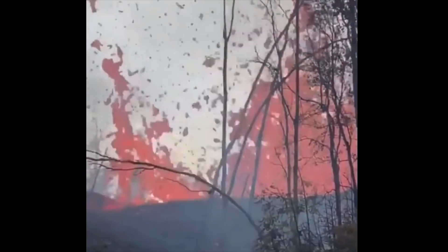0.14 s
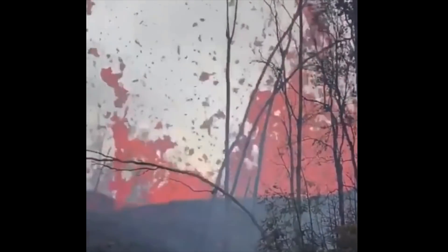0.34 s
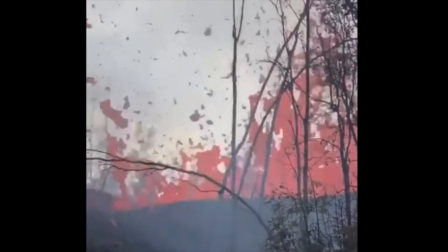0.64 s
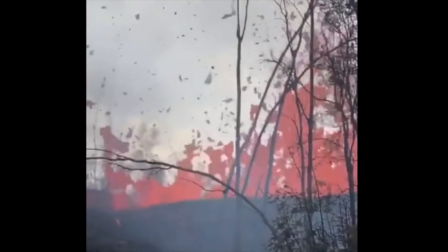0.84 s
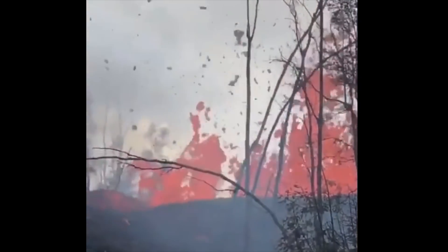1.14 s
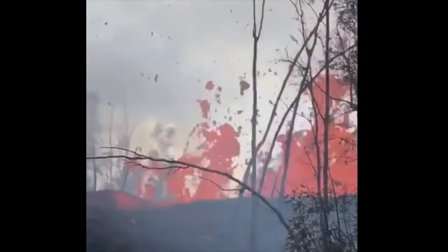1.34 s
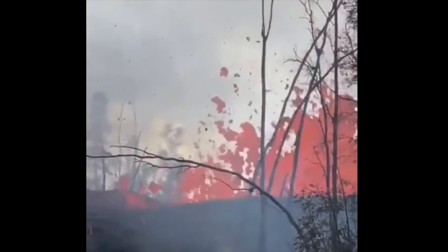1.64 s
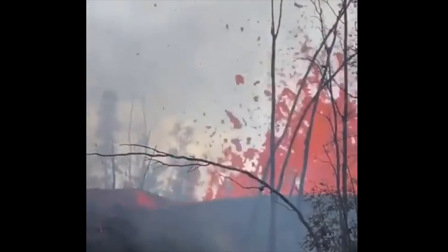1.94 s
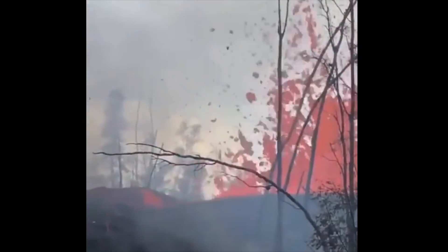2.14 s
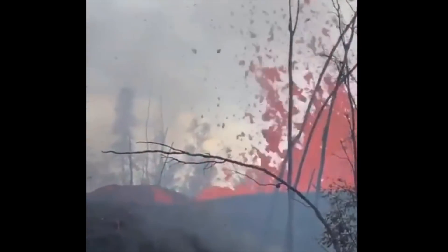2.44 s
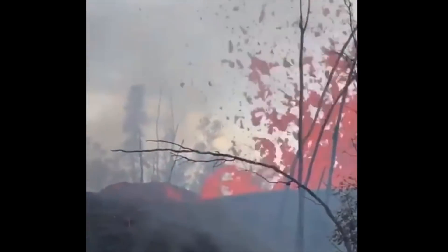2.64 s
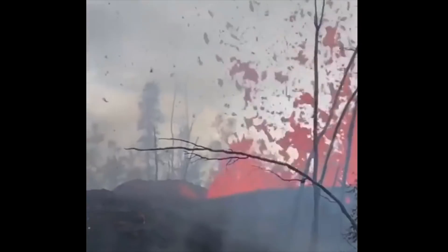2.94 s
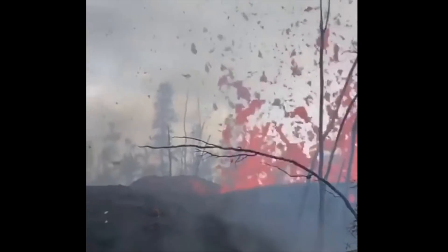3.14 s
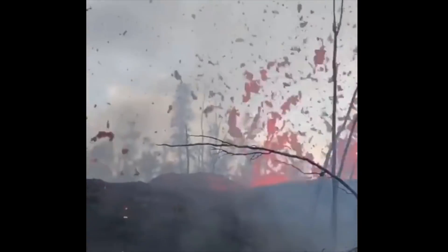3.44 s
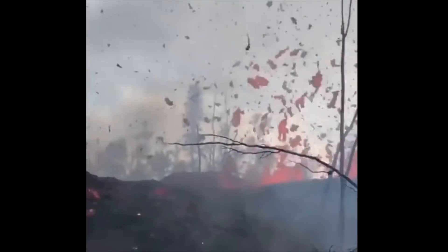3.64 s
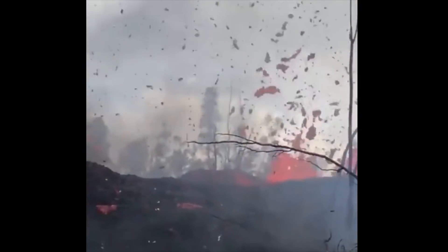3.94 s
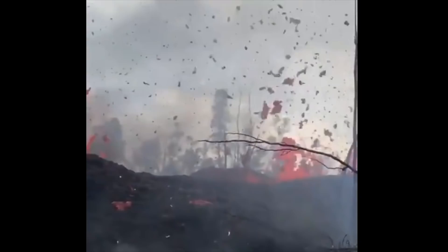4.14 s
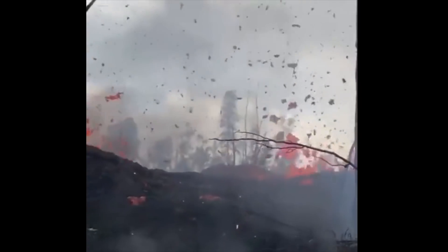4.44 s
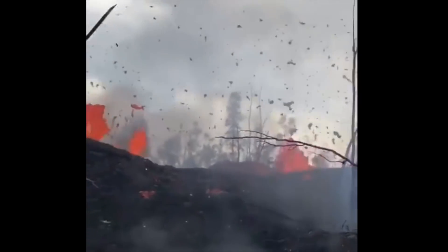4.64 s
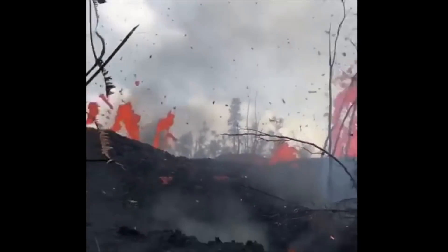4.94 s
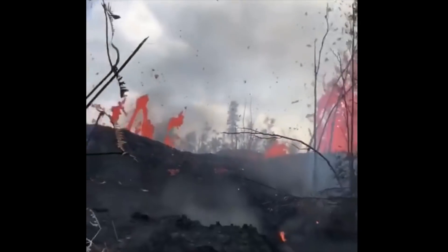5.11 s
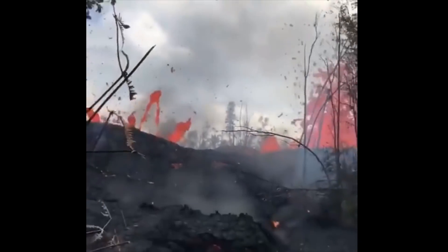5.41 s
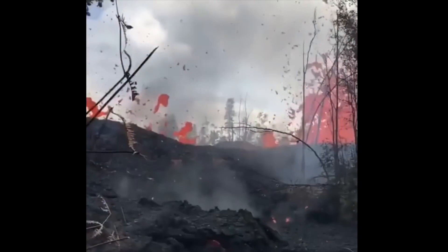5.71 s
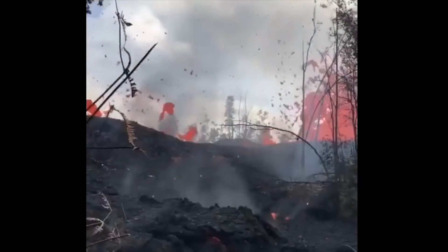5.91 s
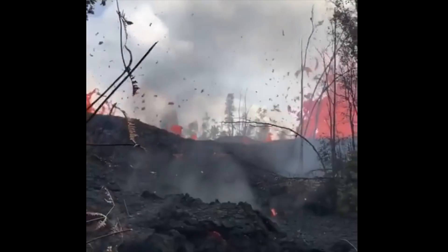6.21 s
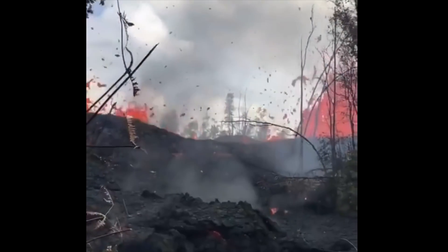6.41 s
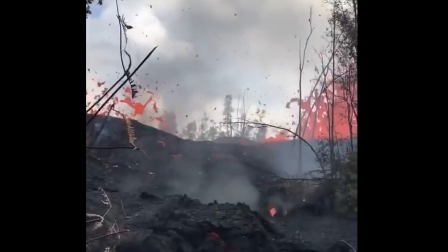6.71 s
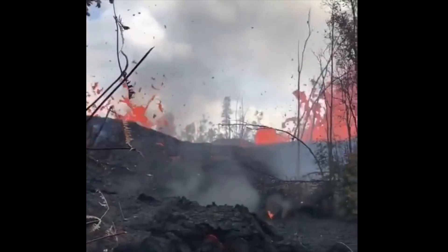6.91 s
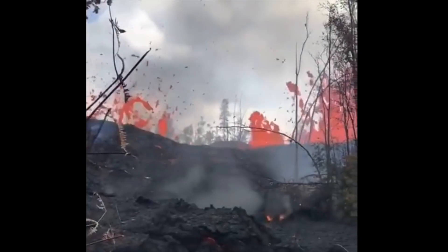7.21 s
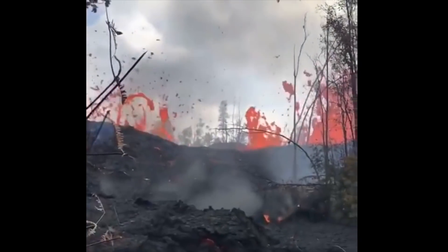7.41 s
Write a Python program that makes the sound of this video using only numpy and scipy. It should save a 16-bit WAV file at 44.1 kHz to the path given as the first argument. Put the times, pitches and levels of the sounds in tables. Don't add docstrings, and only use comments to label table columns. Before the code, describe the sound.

Molten rock and gas blast from a fissure outdoors in a heavy, unsteady roar with crackling, shredding turbulence. Low thumps and wet-sounding spatter puffs ride over it, denser after the first second, with tiny dry ticks close by. The strongest heave comes early, a sag follows past the middle, and fresh surges close it. Handset microphone, faint bottom-end air, rough narrow treble.

```python
import sys
import numpy as np
from scipy import signal
from scipy.fft import rfft, irfft, next_fast_len
from scipy.io import wavfile
from scipy.ndimage import uniform_filter1d

SR = 44100
rng = np.random.default_rng(int(sys.argv[2]) if len(sys.argv) > 2 else 0)


def unload_audio(sound):
    columns = np.transpose(np.atleast_2d(sound))
    steps = np.round(np.clip(columns, -1, 1) * 32767)
    wavfile.write(sys.argv[1], SR, steps.astype(np.int16))


def gain_from_db(level_db):
    decades = np.asarray(level_db, float) / 20
    return 10 ** decades


N = 333396
ENVELOPE_HZ = 200


def rms_one(x):
    return x / np.sqrt(np.mean(x ** 2) + 1e-20)


def coloured(x, spectrum):
    hz, db = np.transpose(spectrum)
    size = next_fast_len(N)
    bins = np.arange(1, size // 2 + 2) * SR / size
    gain = gain_from_db(np.interp(np.log(bins), np.log(hz), db))
    return irfft(rfft(x, size) * gain, size)[:N]


def drift(rate):
    hop = 40
    r = np.exp(-2 * np.pi * rate * hop / SR)
    slow = signal.lfilter([1], [1, -2 * r, r * r], rng.standard_normal(N // hop + 2002))[2000:]
    return np.interp(np.arange(N) / hop, np.arange(len(slow)), rms_one(slow))


def shocklets(per_s, spread_db):
    sizes = gain_from_db(spread_db * np.minimum(rng.exponential(1, N), 5)) * rng.choice([-1, 1], N)
    return rms_one(sizes * (rng.random(N) < per_s / SR))


def swells(s, half_s, edge=2):
    rise_share = .91
    late = np.arange(0, N / SR, 1 / ENVELOPE_HZ) - np.reshape(s, (-1, 1))
    reach = 1.25 * np.reshape(half_s, (-1, 1)) * np.where(late < 0, rise_share, 1)
    return np.exp(-.78 * abs(late / reach) ** edge)


def vent():
    # (time [s], level [dB])
    pressure = [(0.0, -7), (0.69, 4), (1.37, -2.6), (2.06, 2.7), (2.75, -1), (3.44, 3), (4.12, -0.36),
                (4.81, -2.4), (5.5, 0.45), (6.19, 1), (6.87, 0), (7.56, 5)]
    # (time [s], half length [s], loss [dB])
    lulls = [(0.38, 0.12, 10.5), (0.969, 0.057, 6.5), (1.762, 0.046, 2.5), (2.3, 0.017, 5),
             (2.806, 0.025, 7), (3.308, 0.038, 13), (3.81, 0.032, 5), (4.477, 0.035, 4), (5.877, 0.021, 6),
             (6.356, 0.029, 3.5), (6.493, 0.094, 2), (7.132, 0.067, 3.5)]
    # (time [s], half length [s], level over the steady rumble [dB])
    heaves = [(0.026, 0.029, 9.5), (0.196, 0.062, 8), (0.492, 0.047, 4.5), (0.913, 0.22, 7),
              (1.107, 0.015, 7.5), (1.443, 0.085, 10.0), (1.94, 0.15, 11.5), (2.159, 0.015, 18.5),
              (2.29, 0.041, 8.5), (2.423, 0.062, 9), (2.942, 0.22, 8.5), (3.557, 0.11, 9),
              (4.258, 0.32, 4.5), (4.478, 0.0067, -12), (4.747, 0.03, 3), (4.996, 0.042, 5),
              (5.178, 0.078, 7.5), (5.47, 0.1, 2.5), (5.87, 0.057, 6), (6.076, 0.053, 3.5),
              (6.35, 0.029, 0.5), (6.668, 0.02, 4), (7.068, 0.13, 9.5), (7.387, 0.14, 10.0)]
    # (time [s], half length [s], level over the
    # steady jet [dB], brightness [dB per layer])
    surges = [(0.032, 0.054, 6, -1.5), (0.206, 0.038, 5.0, -0.5), (0.39, 0.097, -2, 4.5),
              (0.686, 0.02, 8, 2), (1.237, 0.035, 4, 6.5), (1.37, 0.029, 6.5, -0.5),
              (1.563, 0.011, 0.5, -3), (1.67, 0.018, 8.5, -1), (1.892, 0.049, 5, -0.5),
              (2.118, 0.035, 12.5, 2), (2.372, 0.049, 8.5, 1.5), (2.545, 0.044, 5.5, 5),
              (2.69, 0.026, 1.5, 5), (3.055, 0.14, 8, 0.5), (3.382, 0.044, 8, -3), (4.009, 0.032, 5.5, 3.5),
              (4.813, 0.044, 3, 0), (4.957, 0.023, 6.0, 1), (5.121, 0.065, 4, 6.5),
              (5.302, 0.017, -1, -4.5), (5.498, 0.035, 7.5, 4.0), (5.65, 0.02, 8.0, 5.5),
              (6.082, 0.013, 7.5, 6.5), (6.167, 0.01, 6, -4.5), (6.43, 0.011, 0, -4),
              (6.625, 0.02, 7.5, 4.0), (6.833, 0.02, 0.5, -4.5), (7.001, 0.016, 10, 3),
              (7.213, 0.028, 11.5, 2), (7.421, 0.053, 10, 1),
              (.385, 0.0099, 1.5, 1.5),
        (1.192, 0.0078, 5, 13),
        (2.02, .012, 2.6, 3),
        (2.073, 0.0061, 12, 6),
        (3.03, 0.02, 4, 9),
        (3.09, 0.014, 5.2, 3),
        (4.18, .04, 0.96, -2),
        (5.91, 0.018, 0.81, 0.5),
        (7.47, .02, 8.3, 4.5),
    ]
    # (share of pressure swing [1], share of surge level [1], added to a surge [dB], brightness steps [layers])
    answer = [
        (1.05, 0.9054, -0.96, -1.2),
        (0.93, 1.04, -1.3, 0.4),
        (0.46, 0.92, -3, 0.92),
    ]
    s = np.arange(0, N / SR, 1 / ENVELOPE_HZ)
    at, half_s, loss_db = np.transpose(lulls)
    flow_db = np.interp(s, *np.transpose(pressure)) - loss_db @ swells(at, half_s)

    at, half_s, heave_db = np.transpose(heaves)
    powers = [1 + gain_from_db(2 * heave_db) @ swells(at, half_s)]

    at, half_s, surge_db, bright_db = np.transpose(surges)
    slugs = swells(at, half_s, edge=2.9)
    for share, surge_share, extra_db, steps in answer:
        slug_db = surge_share * surge_db + extra_db + steps * bright_db
        powers.append(gain_from_db(2 * share * flow_db) + gain_from_db(2 * slug_db) @ slugs)
    return s, 10 * np.log10(powers)


def jet(crackle, flutter_db, patchy_db, wisp_db, knotty_db):
    layer_hz = [330, 1400, 3500, 9000]
    # (frequency [Hz], density [dB per Hz])
    jet_spectrum = [(53, -56), (90, -28), (149, -10), (193, -3.5), (295, 1), (620, -15.5), (1180, -7.5),
                    (1360, -7.5), (1730, -4), (2200, -15), (2920, -12), (3710, -13), (4450, -17.5),
                    (7210, -35.5), (11000, -36), (14300, -43), (22000, -120)]
    s, layers_db = vent()
    swing_db = layers_db - 10 * np.log10(np.mean(gain_from_db(2 * layers_db), axis=1, keepdims=True))
    flutter = drift(11.9)
    centres = 100 * 2 ** np.arange(0, 7.6, .5)
    layers = np.arange(len(layer_hz))
    size = next_fast_len(N)
    octave = np.log2(np.arange(1, size // 2 + 2) * SR / size)
    eddies = rfft(coloured(rng.standard_normal(N), jet_spectrum), size)
    tearing = rfft(coloured(shocklets(per_s=6000, spread_db=3.5), jet_spectrum), size)
    out = np.zeros(N)
    for k, hz in enumerate(centres):
        band = np.interp(octave, np.log2(centres), np.arange(len(centres)) == k)
        place = np.interp(np.log(hz), np.log(layer_hz), layers)
        weight = np.maximum(1 - abs(layers - place), 0)
        small = place / (len(layer_hz) - 1)
        share = np.clip(crackle * small, 0, 1)
        sound = irfft(band * (np.sqrt(1 - share) * eddies + np.sqrt(share) * tearing), size)[:N]
        surge_db = np.interp(np.arange(N) / SR, s, weight @ swing_db)
        flicker_db = flutter_db * small * flutter
        flicker_db += (patchy_db + knotty_db * (1 - small) ** 4) * drift(13)
        flicker_db += wisp_db * small ** 2 * drift(22)
        out += sound * gain_from_db(surge_db + flicker_db)
    return gain_from_db(-27) * rms_one(out)


def breeze():
    # (frequency [Hz], density [dB per Hz])
    breeze_spectrum = [(12, -35), (20, 7), (70, 6), (90, -6), (120, -35), (200, -120)]
    # (time [s], half length [s], level change [dB])
    gusts = [(.01, 0.043, 4), (0.095, 0.025, -16), (0.197, .05, 1), (.96, .08, -15), (1.3, .04, -9),
             (1.95, .2, 1), (2.78, .05, -15), (3.42, 0.13, 8), (3.6, .03, -4), (4.485, .06, 2),
             (4.69, .07, -16), (5.0, .05, 10), (5.12, .03, -8), (5.64, .04, -1), (5.75, .03, -15),
             (5.93, .04, -13), (6.08, 0.069, -8), (6.5, .05, -10), (7.033, .07, 7), (7.25, .03, -3),
             (7.374, 0.064, 7), (7.55, .04, 6)]
    at, half_s, change_db = np.transpose(gusts)
    gust_db = change_db @ swells(at, half_s)
    gust_db = np.interp(np.arange(N) / SR, np.arange(len(gust_db)) / ENVELOPE_HZ, gust_db)
    air = rms_one(coloured(rng.standard_normal(N), breeze_spectrum))
    return gain_from_db(-68 + gust_db + 2.5 * drift(8.3)) * air


def thuds(rise_s, t60, level_db):
    # (time [s], peak level [dB], frequency [Hz])
    landings = [(0.1, -36, 318), (0.165, -19.5, 265), (0.769, -20, 276), (0.97, -23, 219),
                (1.048, -19, 270), (1.302, -25, 275), (1.38, -17.5, 300), (1.804, -24, 222),
                (2.101, -20, 334), (2.325, -13.5, 272), (2.419, -16, 309), (2.871, -14.5, 279),
                (3.123, -25, 264), (3.292, -30, 306), (3.525, -19.5, 226), (4.036, -22, 290),
                (4.261, -16.5, 207), (4.398, -18, 225), (4.466, -19, 252), (4.535, -25, 280),
                (4.94, -12.5, 293), (5.016, -17.5, 324), (5.107, -21.5, 221), (5.248, -31, 283),
                (5.809, -20.5, 330), (6.373, -18.5, 331), (7.005, -16, 303), (7.132, -17, 308),
                (7.458, -20, 318), (7.509, -18.5, 245)]
    out, age = np.zeros(N + SR), np.arange(SR // 4) / SR
    shape = -np.expm1(-age / rise_s) * gain_from_db(-60 * age / t60)
    for s, peak_db, hz in landings:
        out[round(s * SR):][:len(age)] += gain_from_db(peak_db + level_db) * shape * np.sin(2 * np.pi * hz * age)
    return out[:N]


def puffs(events, spectrum, rise_s, level_db, per_s):
    envelope, age = np.zeros(N + SR), np.arange(SR // 2) / SR
    for s, peak_db, t60 in events:
        shape = -np.expm1(-age / rise_s) * gain_from_db(-60 * age / t60)
        envelope[round(s * SR):][:len(age)] += gain_from_db(peak_db + level_db) * shape
    return envelope[:N] * rms_one(coloured(shocklets(per_s, spread_db=1.5), spectrum))


def ticks():
    # (time [s], peak level [dB], decay t60 [s])
    snaps = [(0.4494, -37, 0.013), (1.1283, -36, 0.015), (1.546, -32, 0.015), (3.6434, -57, 0.015),
             (3.8004, -48, 0.015), (3.9034, -47, 0.013), (4.5246, -36, 0.017), (5.8494, -45, 0.018),
             (6.3814, -36, 0.015), (6.8174, -43, 0.015), (7.1484, -44, 0.015)]
    # (frequency [Hz], density [dB per Hz])
    snap_spectrum = [(2000, -36), (5000, -10), (8000, 2), (11000, -1), (12500, 3), (14000, -1)]
    return puffs(snaps, snap_spectrum, rise_s=0.00037, level_db=-2.0, per_s=12000)


def bursts():
    # (time [s], peak level [dB], decay t60 [s])
    pops = [(0.5586, -33, 0.07), (0.6568, -30, 0.061), (1.1808, -22.5, 0.047), (1.3638, -16, 0.055),
            (1.6477, -17, 0.06), (2.0566, -17, 0.12), (2.1074, -16, 0.059), (2.3164, -22.5, 0.057),
            (2.4903, -21, 0.086), (2.652, -19, 0.1), (3.069, -16, 0.066), (3.3526, -15.5, 0.051),
            (3.4994, -26.5, 0.08), (3.9759, -20.5, 0.13), (4.2897, -21, 0.077), (4.749, -22, 0.079),
            (4.8227, -27.5, 0.071), (4.9385, -20.5, 0.074), (5.4225, -30, 0.066), (5.6313, -21, 0.081),
            (5.7494, -21.5, 0.076), (6.0544, -21.5, 0.073), (6.15, -22.5, 0.083), (6.3988, -30, 0.082),
            (6.5909, -28, 0.071), (6.9555, -22, 0.086), (6.983, -19, 0.051), (7.171, -18.5, 0.066),
            (7.405, -20, 0.057)]
    # (frequency [Hz], density [dB per Hz])
    pop_spectrum = [(350, -50), (600, -8.5), (844, -18), (1060, -5), (1750, -4), (2210, -10.5),
                    (3720, -7.5), (11000, -40.5), (14300, -64), (22000, -120)]
    return puffs(pops, pop_spectrum, rise_s=.004, level_db=-2.5, per_s=5000)


def scene():
    fountain = jet(crackle=.35, flutter_db=0.58, patchy_db=1.32, wisp_db=1.46, knotty_db=0.84)
    clots = thuds(rise_s=0.0065, t60=0.062, level_db=2.5)
    return (fountain + breeze() + clots + ticks() + bursts())[None]


def microphone_port(x):
    # (frequency [Hz], gain [dB])
    port_resonance = [(20, -1), (11300, 0), (12300, 7), (13000, 6.5), (13900, 6)]
    return coloured(x, port_resonance)


def handset_rounding(x, waver_db, fill):
    # (frequency [Hz], band rms over rounding step [dB])
    line_fineness = [(150, 30), (500, 4), (1200, -2), (2500, -3), (5000, -4), (8000, -4.5), (10000, -6),
                     (12000, -8.5), (13600, -10.5)]
    size, order, top_hz = 1024, 24, 13900
    n, k = np.arange(2 * size), np.arange(size)
    basis = np.cos(np.pi / size * np.outer(n + (1 + size) / 2, k + 1 / 2))
    basis *= np.sqrt(2 / size) * np.sin(np.pi * (n[:, None] + 1 / 2) / (2 * size))
    blocks = np.pad(x, (size, 2 * size - N % size)).reshape(-1, size)
    lines = np.hstack([blocks[:-1], blocks[1:]]) @ basis
    hz = (k + 1 / 2) * SR / (2 * size)
    power = uniform_filter1d(uniform_filter1d(lines ** 2, size=15, axis=1), size=3, axis=0)
    level = np.sqrt(power + 1e-20)
    waver = rng.standard_normal((len(lines), size // order + 1))
    waver = np.repeat(waver, order, axis=1)[:, :size]
    point_hz, point_db = np.transpose(line_fineness)
    step = level / gain_from_db(np.interp(np.log(hz), np.log(point_hz), point_db) + waver_db * waver)
    whole = np.floor((abs(lines) / step) ** (3 / 4) + .4054)
    kept = np.sign(lines) * step * whole ** (4 / 3) + fill * lines
    frames = (kept * (hz < top_hz)) @ basis.T
    return (frames[1:, :size] + frames[:-1, size:]).ravel()[:N]


def roll_off(x):
    return signal.sosfilt(signal.butter(12, 14330, fs=SR, output="sos"), x)


def record(dry):
    mix = handset_rounding(microphone_port(dry[0]), waver_db=3, fill=.08)
    return roll_off(mix[None])


dry = scene()
out = record(dry)
unload_audio(out)
```